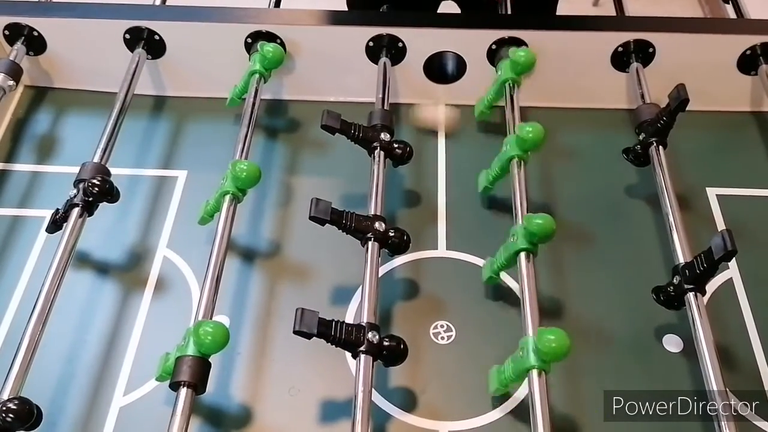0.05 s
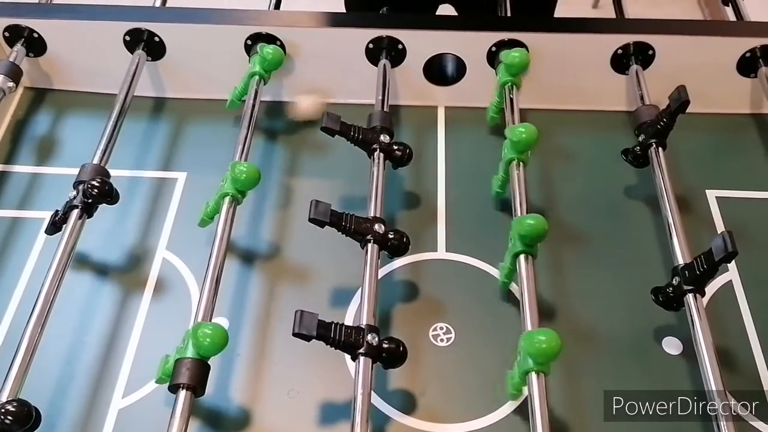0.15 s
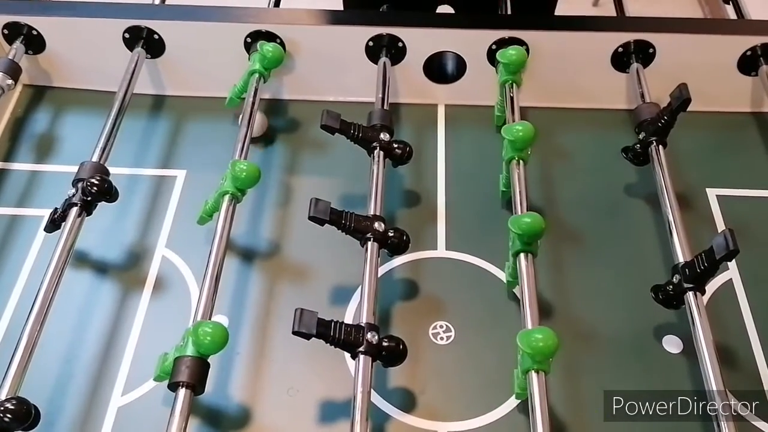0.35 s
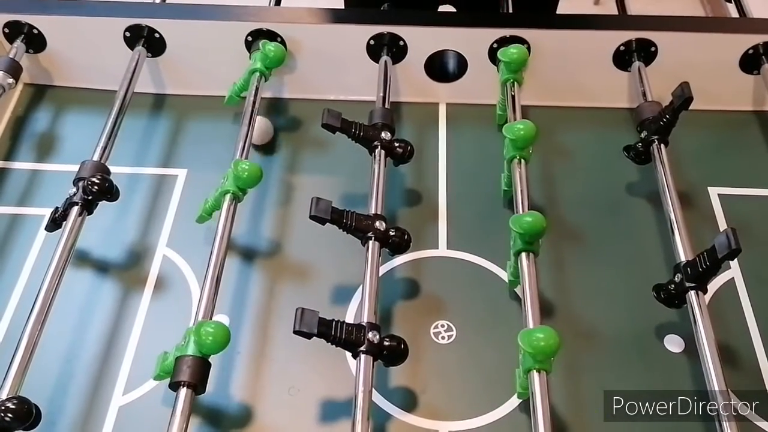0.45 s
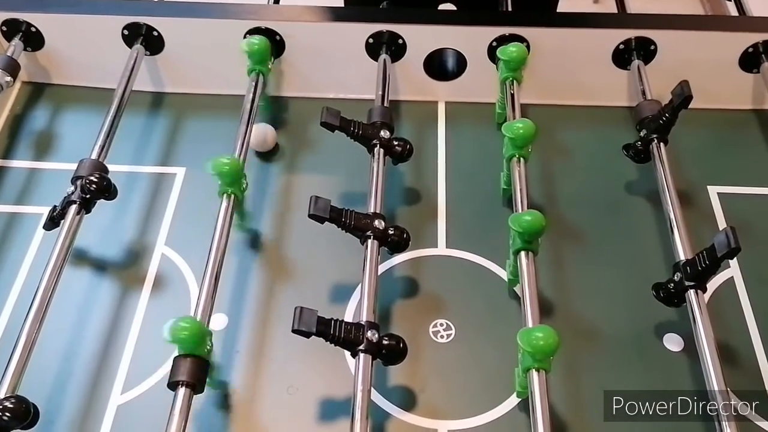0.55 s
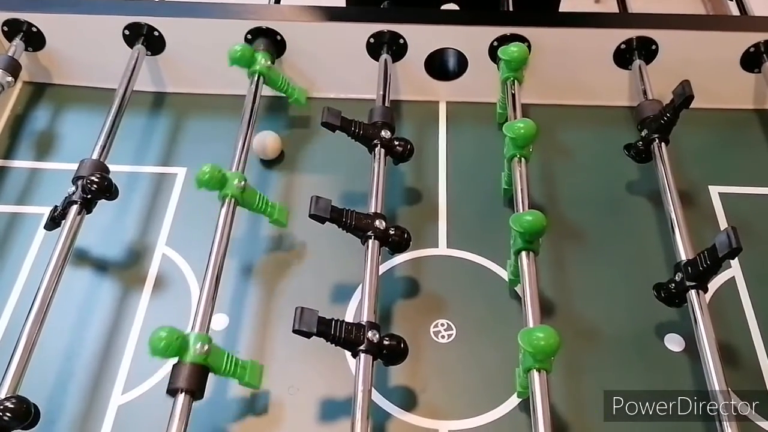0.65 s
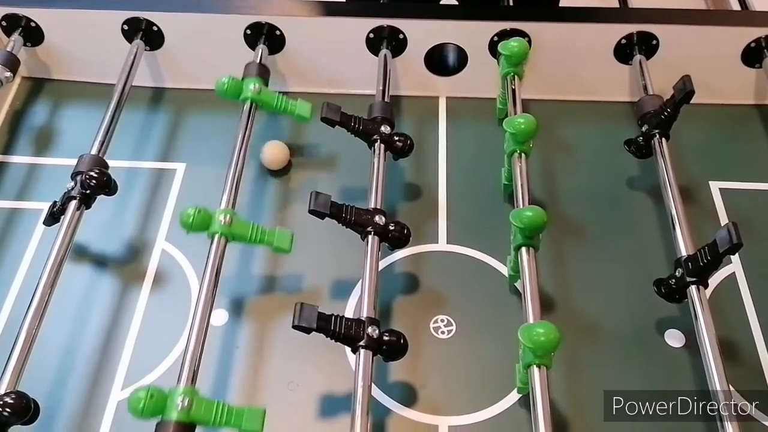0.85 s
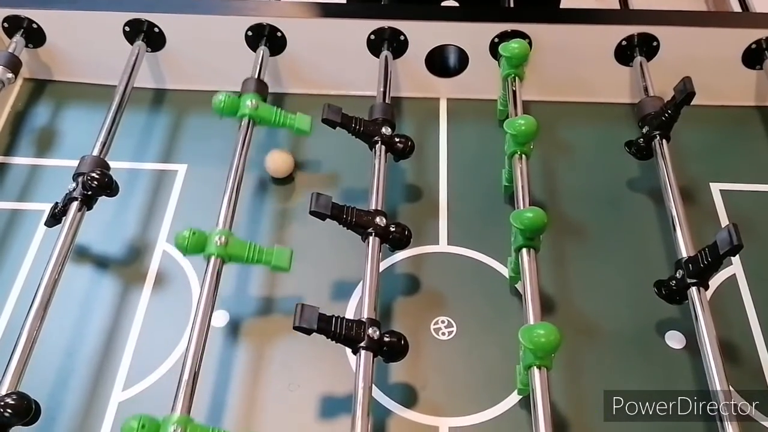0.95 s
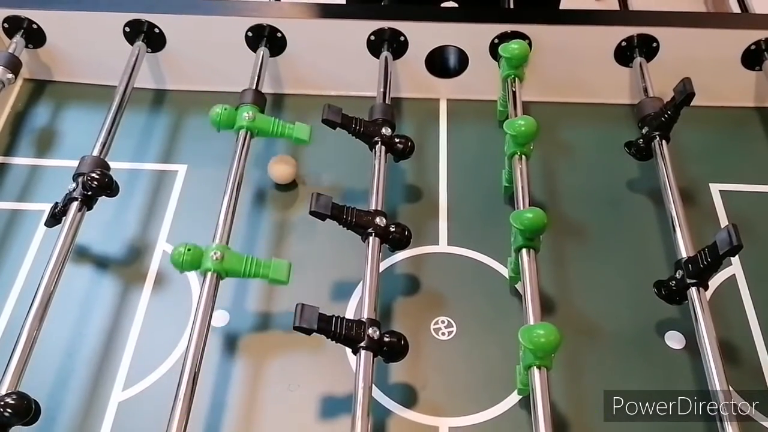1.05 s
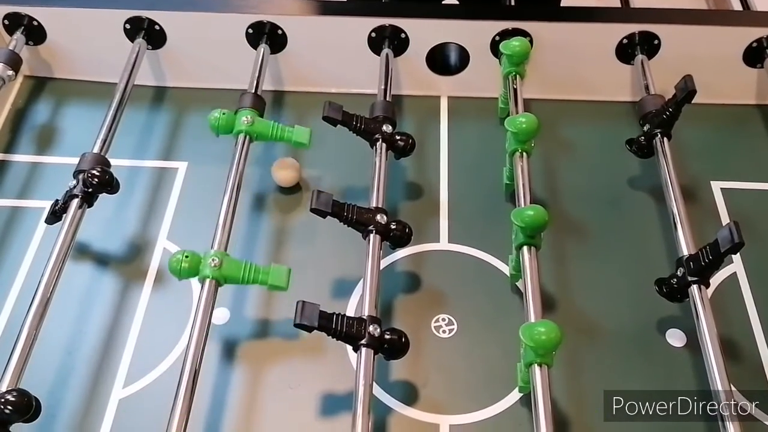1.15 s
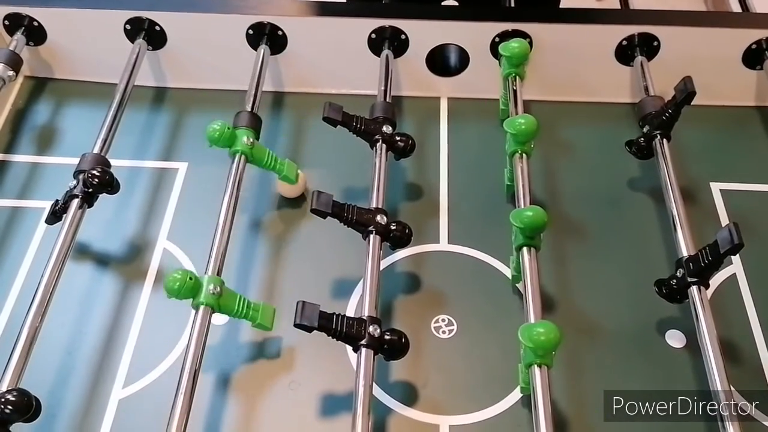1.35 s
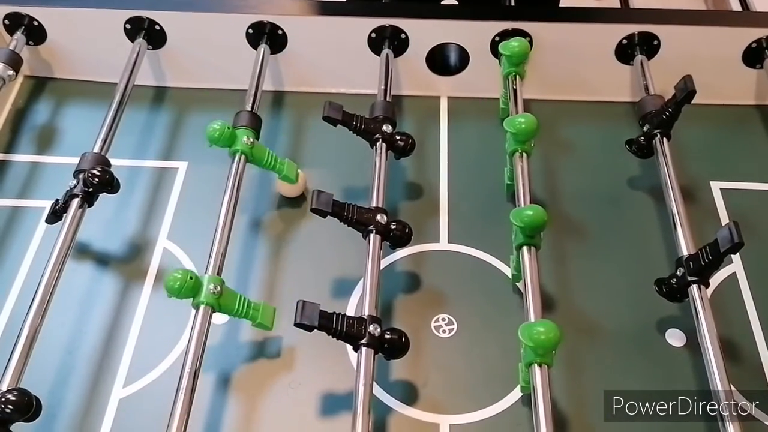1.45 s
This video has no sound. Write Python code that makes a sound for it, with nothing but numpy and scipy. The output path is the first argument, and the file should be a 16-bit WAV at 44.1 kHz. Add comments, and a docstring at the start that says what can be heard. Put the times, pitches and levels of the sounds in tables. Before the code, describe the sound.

A foosball cracks against the table's side wall and a plastic figure in a quick cluster, while a rod thuds into its stop. Then, slightly left, the ball rolls softly and a steel rod slides, heard close in a room.

```python
"""Table football in a room

Close to the table, on a stereo pair: a hard ball cracks against the side wall and a plastic figure,
and a rod thuds into its stop. The cabinet rings and the room answers. Then, a little to the left,
the ball rolls softly over the playfield while a steel rod slides in its bearings."""
import sys
import numpy as np
from scipy.fft import rfft, irfft
from scipy.io import wavfile
from scipy.ndimage import uniform_filter1d, map_coordinates

SR = 44100
rng = np.random.default_rng(int(sys.argv[2]) if len(sys.argv) > 2 else 0)


def put_to_file(sound):
    """Save the sound as 16-bit audio at rate SR, in the file named by the first command-line argument."""
    columns = np.atleast_2d(sound).T  # one column per channel
    safe = np.clip(columns, -1, 1)
    whole_steps = np.round(safe * 32767)
    wavfile.write(sys.argv[1], SR, whole_steps.astype(np.int16))


N = 66150
FFT_SIZE = 2 ** 17
HZ = np.fft.rfftfreq(FFT_SIZE, 1 / SR)
T = np.arange(N) / SR


def amp(db):
    """Decibels to gain."""
    return 10 ** (np.asarray(db) / 20)


def unit(x):
    """Scale to rms 1."""
    return x / np.sqrt(np.mean(x ** 2) + 1e-20)


def along(points, hz=HZ):
    """Read (frequency, value) points on a log frequency axis."""
    freqs, values = np.transpose(points)
    return np.interp(np.log(hz + 1), np.log(freqs + 1), values)


def unit_colour(points):
    """A spectrum in dB with mean power 1."""
    return 20 * np.log10(unit(amp(along(points))))


def level(points):
    """Gain per sample from (time [s], level [dB]) points."""
    return amp(np.interp(T, *np.transpose(points)))


def fade(t60):
    """Exponential decay by 60 dB in t60 seconds."""
    return np.exp(-np.log(1000) * T / t60)


def wobble(rate):
    """A smooth random curve, rate knots a second."""
    return map_coordinates(rng.standard_normal(N // 10), [T * rate], mode="wrap")


def add(out, x, start_s):
    """Mix x into out from start_s on."""
    i = round(start_s * SR)
    out[:, i:] += x[:, :N - i]


def filtered(x, response):
    """Pass x through a frequency response."""
    return irfft(rfft(x, FFT_SIZE) * response, FFT_SIZE)[..., :N]


def causal(gain):
    """Minimum-phase response with the given gain: nothing sounds ahead of a blow."""
    cepstrum = irfft(np.log(np.maximum(gain, 1e-7)))
    cepstrum[..., 1:FFT_SIZE // 2] *= 2
    cepstrum[..., FFT_SIZE // 2 + 1:] = 0
    return np.exp(rfft(cepstrum))


# Stereo width at the microphones: (frequency [Hz], side over mid [dB])
STEREO_WIDTH = [(60, -7), (250, -14.5), (550, -9), (820, -8), (1150, 3), (2000, -3), (4000, 1), (12000, -1)]


def spread(pair):
    """Two unrelated signals to left and right: bass nearly mono, treble wide."""
    width = amp(along(STEREO_WIDTH))
    mid, side = filtered(pair, np.array([np.ones_like(width), width]) / np.sqrt(1 + width ** 2))
    return np.array([mid + side, mid - side])


def from_left(x, lead_s=0.000336):
    """The sound reaches the left microphone first."""
    return filtered(x, np.exp(1j * np.pi * HZ * lead_s * np.array([[1], [-1]])))


def noise(colour):
    """Steady stereo noise of rms 1 in the given colour."""
    white = rfft(rng.standard_normal((2, FFT_SIZE)))
    return unit(spread(irfft(white * amp(along(colour)))[:, :N]))


def modes(table, scatter_db, attack_s):
    """Damped sines, differing in strength at every blow and in phase at each microphone."""
    x = np.zeros((2, N))
    for (hz, db, t60), (strength, side) in zip(table, rng.standard_normal((len(table), 2))):
        phase = np.sign(side) * np.arctan(amp(along(STEREO_WIDTH, hz))) * np.array([[1], [-1]])
        x += amp(db + scatter_db * strength) * fade(t60) * np.sin(2 * np.pi * hz * T + phase)
    return x * (1 - np.exp(-T / attack_s))


def dense_ring(t60s, rise_s):
    """Countless overlapping modes as evenly coloured noise, each band dying at its own rate."""
    white = rfft(rng.standard_normal((2, N)), FFT_SIZE)
    ring = np.zeros((2, N))
    for k, (_, t60) in enumerate(t60s):
        band = along([(hz, j == k) for j, (hz, _) in enumerate(t60s)])  # a lone row spans all bands
        ring += irfft(white * band)[:, :N] * fade(t60)
    ring *= 1 - np.exp(-T / rise_s)
    power = np.abs(uniform_filter1d(np.abs(rfft(ring, FFT_SIZE)) ** 2, size=401))
    return spread(filtered(ring, causal(1 / np.sqrt(power + 1e-12))))


def ripple(spacing_hz=219.6):
    """Random peaks and dips of about 1 dB across the treble, different for each point of impact."""
    knots = rng.standard_normal(1000)
    return map_coordinates(knots, [HZ / spacing_hz], mode="wrap") * HZ / (HZ + 1500)


# Spectrum of the room tone: (frequency [Hz], relative level [dB])
AIR_COLOUR = [(25, -16.5), (60, 7), (120, -11.5), (300, -1.5), (1000, -18.5), (4000, -17.5), (10000, -27.5),
              (15000, -34)]


def room_tone(level_db=-76):
    """The quiet air of the room, all round the microphones."""
    return amp(level_db) * noise(AIR_COLOUR)


# Reverberation of the room: (frequency [Hz], T60 [s])
ROOM_DECAY = [(60, 1.0), (130, 1.0), (240, .8), (400, 0.42), (800, 0.48), (2000, 0.38), (5000, 0.45),
              (12000, 0.32)]
# Its strength at the microphones: (frequency [Hz], level against the direct sound [dB])
ROOM_RETURN = [(60, -1), (250, -2), (700, -5.5), (2000, -11), (4000, -10), (10000, -11)]


def blow_in_room(colour_db, t60s, rise_s):
    """A short coloured burst, and the room's answer swelling behind it."""
    direct = dense_ring(t60s, rise_s)
    room = filtered(dense_ring(ROOM_DECAY, rise_s=0.0082), causal(amp(along(ROOM_RETURN))))
    gain = np.sqrt(SR / 100)  # from energy 1 to that of 10 ms at rms 1
    return gain * filtered(direct + room, causal(amp(colour_db)))


# Course of the rod's friction: (time [s], level [dB])
SLIDE_LEVEL = [(0, -67.5), (.05, -66.5), (.17, -69), (.6, -65.5), (.745, -67.5), (.77, -63.5), (.8, -71),
               (.89, -74), (1.0, -74), (1.17, -65.5), (1.24, -71), (1.3, -78), (1.5, -80.5)]
# Spectrum of sliding steel: (frequency [Hz], relative level [dB])
SLIDE_SPECTRUM = [(100, -7), (700, -3.5), (1300, -4.5), (1850, 1.5), (2150, 1), (2500, -2.5), (2800, -2.5),
                  (4000, -11.5), (5500, -11), (7500, -20.5), (10000, -18), (12500, -31), (15000, -25)]


def rod_slide():
    """Finely grained friction of a steel rod in its bearings."""
    grain = amp(0.78 * wobble(150))
    return level(SLIDE_LEVEL) * noise(SLIDE_SPECTRUM) * grain


def wavering(hz, width_hz, waver_db):
    """A narrow resonance kept ringing: its pitch and strength drift."""
    drift_hz = width_hz * wobble(2 * width_hz) / 2
    strength = amp(waver_db * wobble(width_hz))
    return unit(strength * np.sin(2 * np.pi * np.cumsum(hz + drift_hz) / SR))


# Course of the ball's rumble: (time [s], level [dB])
RUMBLE_LEVEL = [(0, -64.5), (.19, -75.5), (.5, -78), (.75, -76.5), (.9, -72), (1.02, -72), (1.2, -71),
                (1.29, -71.5), (1.5, -76)]
# Spectrum of the rumble: (frequency [Hz], relative level [dB])
RUMBLE_COLOUR = [(25, -8), (50, 1), (80, -5.5), (170, -4.5), (250, 2), (420, -9), (560, 0.5), (680, -8.5),
                 (810, -1.5), (1200, -13), (3000, -32.5), (12000, -62)]
# Playfield resonances: (frequency [Hz], width [Hz], waver [dB], list of (time [s], level [dB]))
PLAYFIELD_MODES = [(123.5, 5, 1, [(0, -78), (.3, -83), (.56, -56), (.72, -66), (.88, -71.5), (1.08, -67.5),
                   (1.21, -69), (1.31, -87), (1.5, -84)]), (289, 2.7, 1.5, [(0, -79), (.1, -70.5),
                   (.2, -76.5), (.8, -86), (1.5, -81)]), (559, 14, 3, [(0, -82), (.7, -79), (.8, -72),
                   (.92, -75), (1.02, -70), (1.2, -70), (1.5, -77)]), (790, 18, 1.5, [(0, -86), (.9, -88),
                   (1.13, -91), (1.205, -66.5), (1.27, -80.5), (1.5, -91.5)])]


def ball_roll():
    """The ball rumbles unevenly and excites different playfield resonances along its way."""
    rumble = level(RUMBLE_LEVEL) * noise(RUMBLE_COLOUR) * amp(0.43 * wobble(35))
    playfield = sum(level(course) * wavering(hz, width_hz, waver_db)
                    for hz, width_hz, waver_db, course in PLAYFIELD_MODES)
    return rumble + playfield


# The rod meets its stop and rattles: (time [s], thud gain [dB], tick gain [dB])
ROD_HITS = [(.2597, -23, -41), (.2802, -42, -57)]
# Spectra of the rubber's thud and the steel's tick: (frequency [Hz], relative level [dB])
RUBBER_COLOUR = [(25, -34), (70, -23), (150, -11.5), (270, -2), (450, -9.5), (900, -27.5), (2000, -24.5),
                 (8000, -90.5)]
STEEL_COLOUR = [(100, -37), (1500, -7.5), (3000, -0.5), (6500, -9), (9800, -2), (12500, -18.5),
                (15000, -25)]
# The panel's damped push and the cabinet's longer ring: (frequency [Hz], relative level [dB], T60 [s])
PANEL_THUMP = [(258, 6, .065)]
CABINET_RING = [(50, -19, .6), (116, -11, .33), (175, -17, .35), (198, -14, .35), (238, -10, .3),
                (294, -9, .26), (351, -9, .22), (506, -21, .22), (548, -17, .2)]


def rod_stops(thud_t60_s=0.035, tick_t60_s=0.029):
    """The rubber stop thumps the cabinet while the steel rod ticks in its bearing."""
    out = np.zeros((2, N))
    for start_s, thud_db, tick_db in ROD_HITS:
        thud = amp(-5) * blow_in_room(unit_colour(RUBBER_COLOUR), [(1, thud_t60_s)], rise_s=0.0012)
        thump = modes(PANEL_THUMP, scatter_db=0.5, attack_s=0.0007)
        cabinet = amp(-0.5) * modes(CABINET_RING, scatter_db=4, attack_s=0.0049)
        tick = blow_in_room(unit_colour(STEEL_COLOUR) + ripple(), [(1, tick_t60_s)], rise_s=0.0003)
        add(out, amp(thud_db) * (thud + thump + cabinet) + amp(tick_db) * tick, start_s)
    return out


# Ball contacts, the last followed by a brief early reflection (the final row): (time [s], ringing part,
# ring [dB], bass [dB], wooden body [dB], plastic clack [dB], treble click [dB], left over right [dB])
KNOCK_ARRIVALS = [(.2176, "wall", -32, -26.5, -23, -26, -26.5, -2.5),
                  (.2235, "wall", -36.5, -37, -36.5, -21, -25, 4),
                  (.2314, "wall", -27.5, -42, -20.5, -26, -34.5, 1.5),
                  (.2383, "wall", -36.5, -37, -25, -30.5, -28, 2),
                  (.3015, "figure", -49.5, -37.5, -32.5, -38, -58, -1.5),
                  (.3329, "wall", -31, -48, -21.5, -27, -43, 0.5),
                  (.4340, "figure", -30.5, -45, -26, -27.5, -27.5, 1.5),
                  (.4400, "figure", -46.5, -38, -25.5, -37.5, -37, -3.5)]
# Centres of those four bands, bass to treble: (frequency [Hz])
CLACK_BANDS = [200, 750, 2000, 7000]
# Spectra of the clack and of the crack that opens it: (frequency [Hz], relative level [dB])
CLACK_COLOUR = [(25, -38), (36, -16.5), (50, -2.5), (65, -2), (150, -5.5), (280, 1), (450, -0.5),
                (780, -1.5), (1150, -3.5), (1400, -5), (2000, -3.5), (2500, -16.5), (4200, -20.5),
                (5000, -24.5), (9800, -32.5), (12000, -49), (15000, -54)]
CRACK_SPECTRUM = [(200, -24.5), (1500, -0.5), (4400, 6.5), (7000, -6), (10000, -12), (15000, -31)]
# Decay of the clack: (frequency [Hz], T60 [s])
CLACK_DECAY = [(100, 0.078), (700, 0.05), (2000, 0.056), (5000, 0.03), (12000, 0.029)]
# Heavily damped resonances of each part: (frequency [Hz], half-width [Hz], lift [dB])
PART_PEAKS = { "wall": [(2050, 150, -0.5), (2570, 120, -0.5), (4100, 330, 5), (4100, 110, -1),
              (5940, 200, 3.5), (7300, 300, 7)], "figure": [(2176, 198, 10), (2875, 160, 9.5),
              (3556, 350, 8.5), (5780, 350, 8.5), (7720, 320, 4.5), (11700, 290, 9.5), (14000, 400, 9)]}
# Ringing modes of each part: (frequency [Hz], relative level [dB], T60 [s])
PART_MODES = { "wall": [(108, -14, .25), (150, -17, .3), (268, -10, .3), (396, -14, .15), (649, -11, .22),
              (739, -14, .2), (805, -8, .28), (1050, -20, .22), (1296, -18, .15), (1545, -18, .16),
              (1648, -18, .16), (1748, -18, .15), (1951, -15, .13)] , "figure": [(190, -18, .6),
              (221, -12, .55), (382, -20, .3), (475, -13, .18), (582, -17, .28), (660, -12, .22),
              (778, -11, .22), (850, -17, .33), (950, -14, .2), (2046, -8, .17), (2155, -13, .14),
              (2290, -9, .08)]}


def ball_knocks(crack_over_treble_db=-9, crack_t60_s=0.0059):
    """Each knock, and the last one's early reflection: a crack, a clack and the ring of wall or figure."""
    out = np.zeros((2, N))
    for start_s, part, ring_db, *bands_db, pan_db in KNOCK_ARRIVALS:
        peaks_db = sum(db / (1 + ((HZ - hz) / width) ** 2) for hz, width, db in PART_PEAKS[part])
        balance_db = along(list(zip(CLACK_BANDS, bands_db)))
        colour_db = unit_colour(CLACK_COLOUR) + balance_db + peaks_db + ripple()
        clack = blow_in_room(colour_db, CLACK_DECAY, rise_s=0.00055)
        crack = amp(bands_db[-1] + crack_over_treble_db) * noise(CRACK_SPECTRUM) * fade(crack_t60_s)
        ring = amp(ring_db) * modes(PART_MODES[part], scatter_db=5.5, attack_s=0.0011)
        pan = amp([[pan_db / 2], [-pan_db / 2]])
        add(out, (crack + clack + ring) * pan, start_s)
    return out


def scene():
    """The table in front of the microphones, over the quiet air of the room."""
    return room_tone() + ball_knocks() + rod_stops() + from_left(ball_roll() + rod_slide())


def record(dry, low_cut_hz=36, top_hz=15400):
    """The recorder trims the deepest bass and falls off steeply at its band limit."""
    low_cut = -HZ ** 2 / (low_cut_hz ** 2 - HZ ** 2 + 1j * HZ * low_cut_hz)
    band_limit = 1 / (1 + (HZ / top_hz) ** 120)
    return filtered(dry, low_cut * band_limit)


dry = scene()
out = record(dry)
put_to_file(out)
```